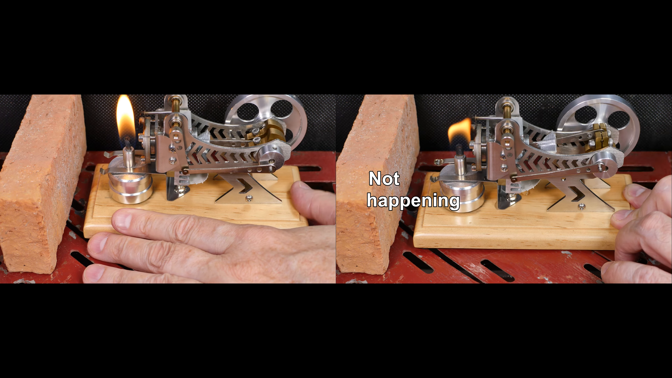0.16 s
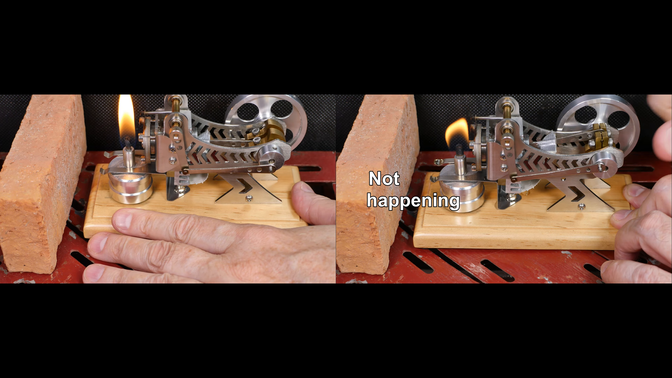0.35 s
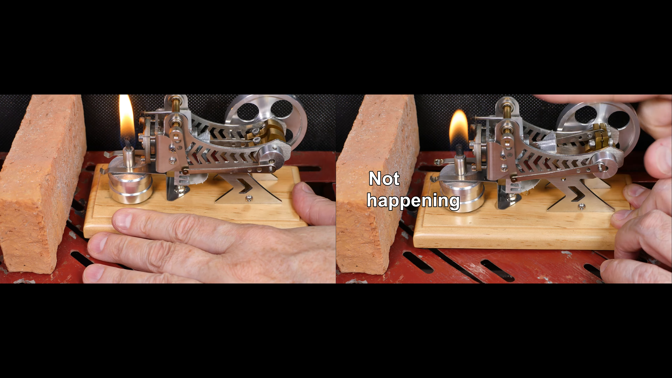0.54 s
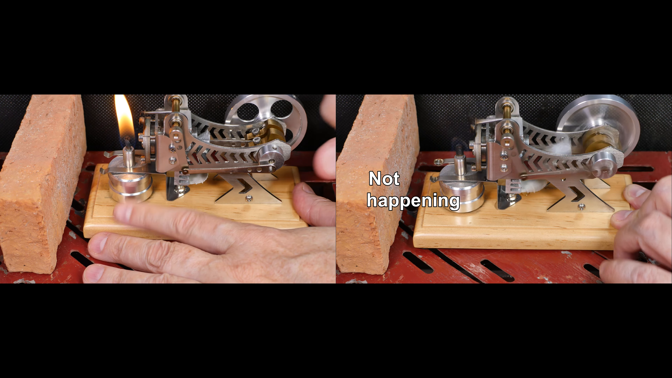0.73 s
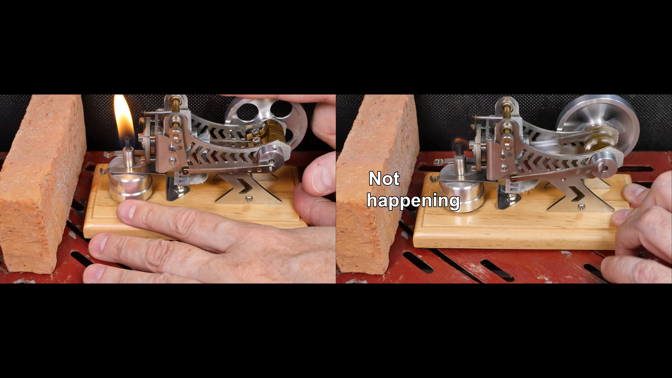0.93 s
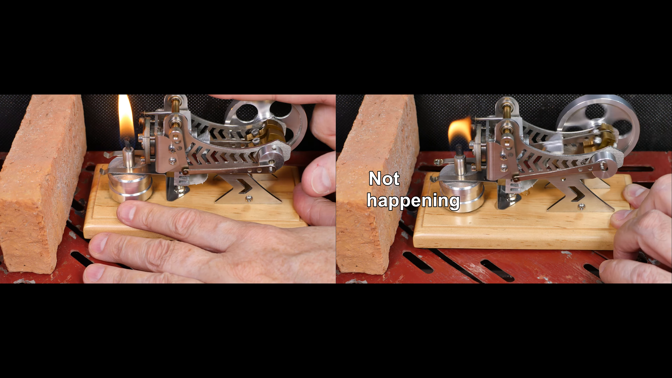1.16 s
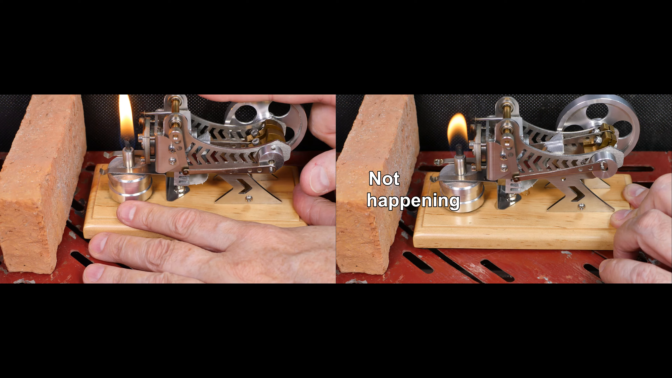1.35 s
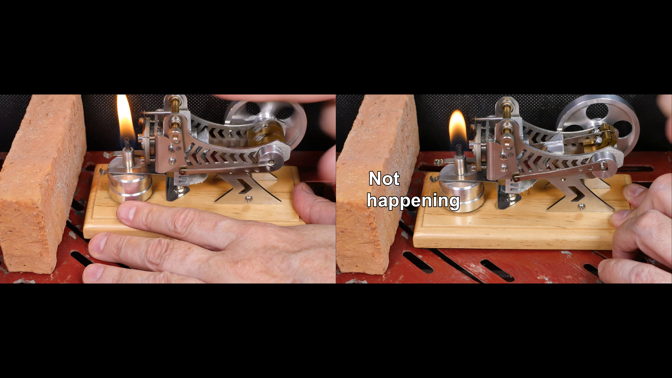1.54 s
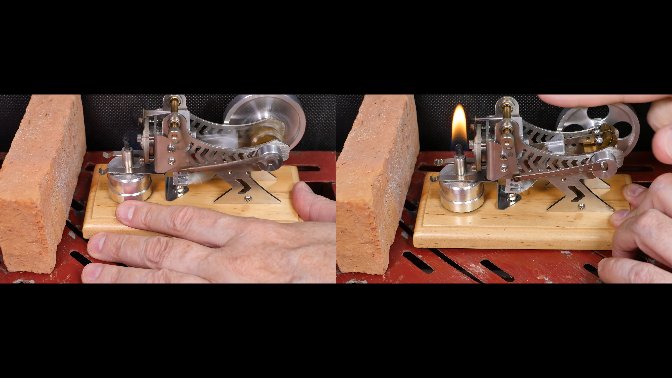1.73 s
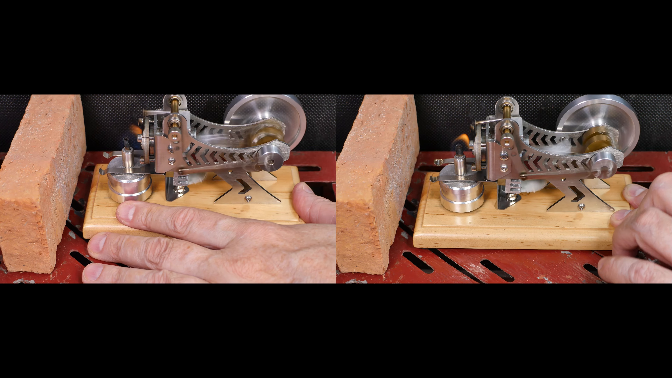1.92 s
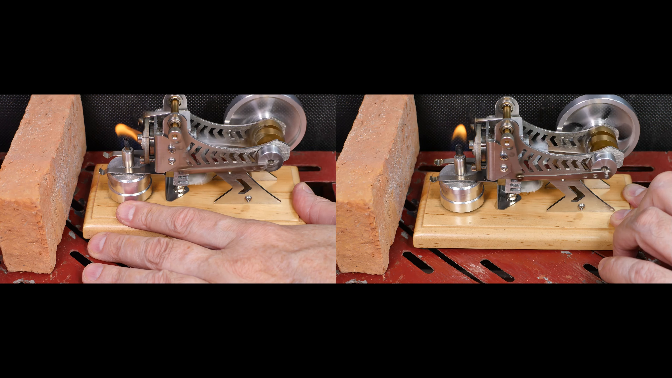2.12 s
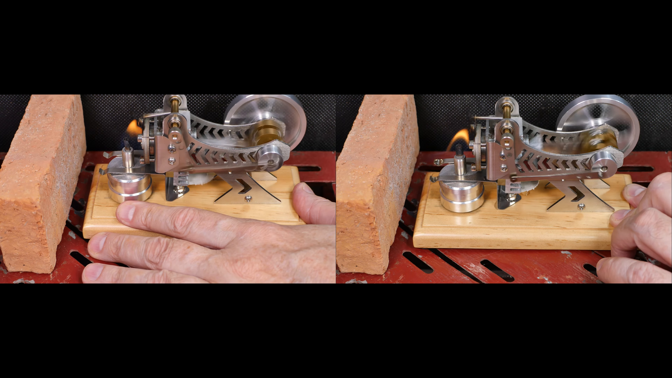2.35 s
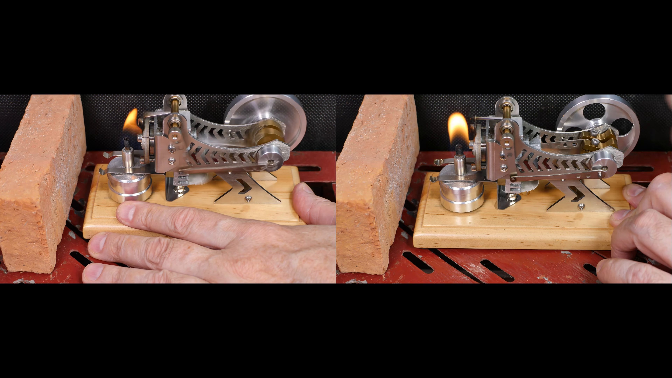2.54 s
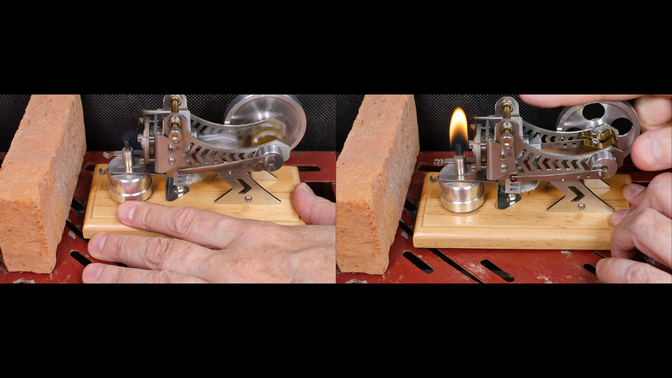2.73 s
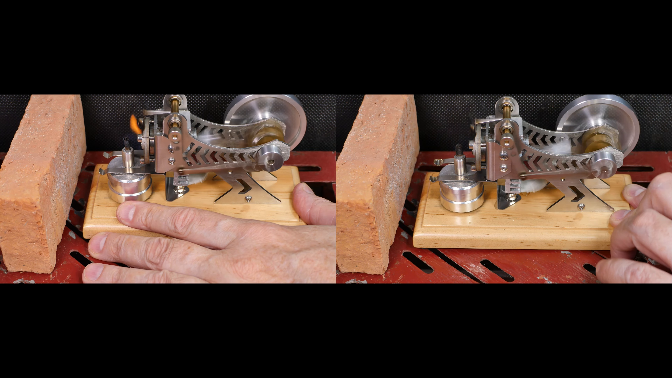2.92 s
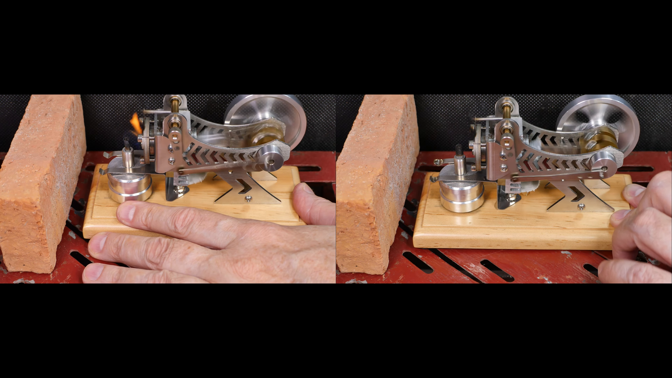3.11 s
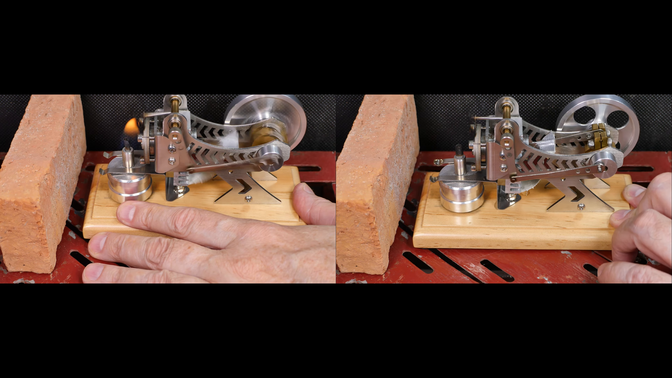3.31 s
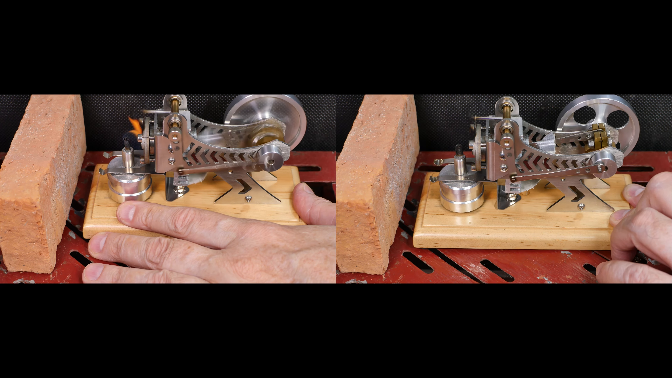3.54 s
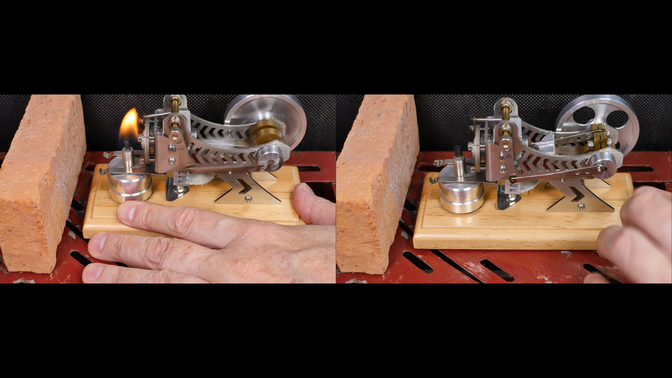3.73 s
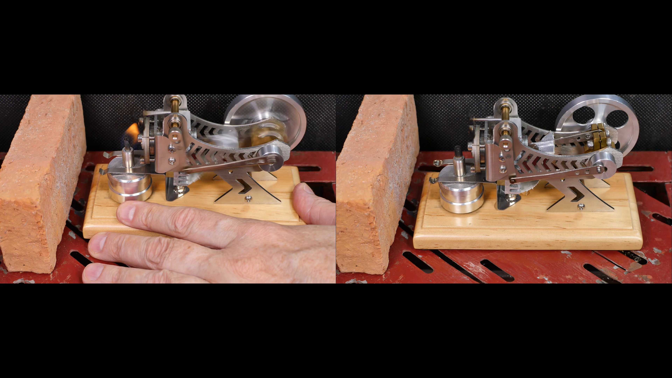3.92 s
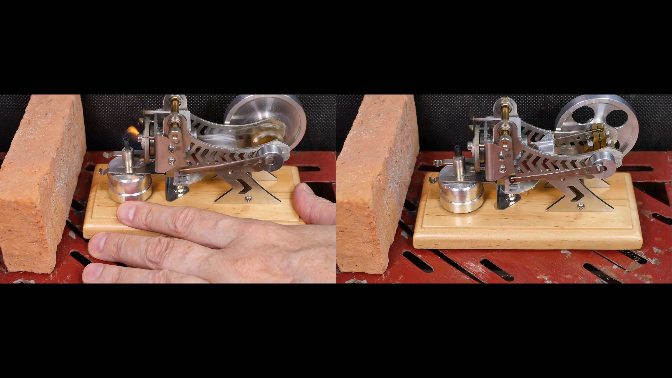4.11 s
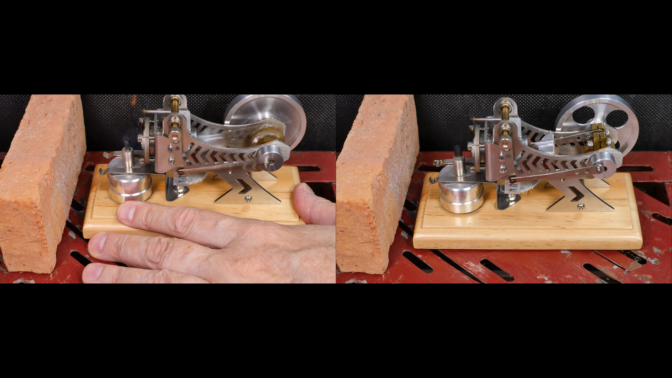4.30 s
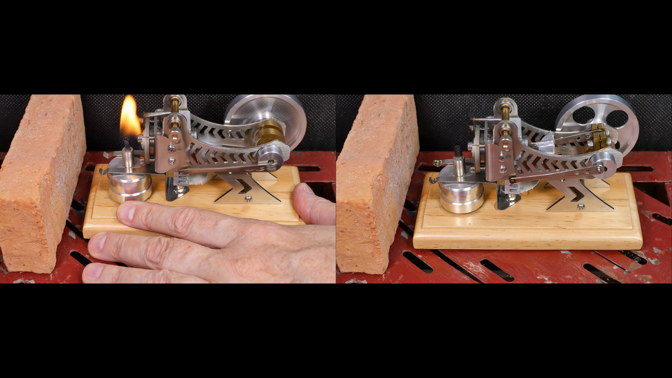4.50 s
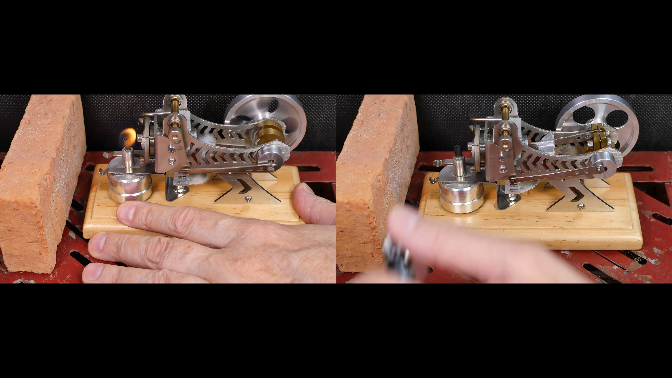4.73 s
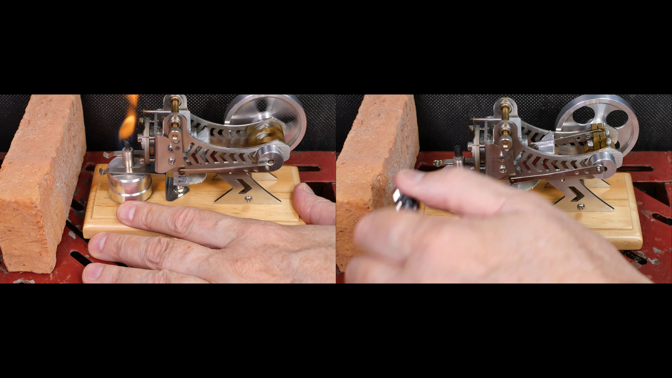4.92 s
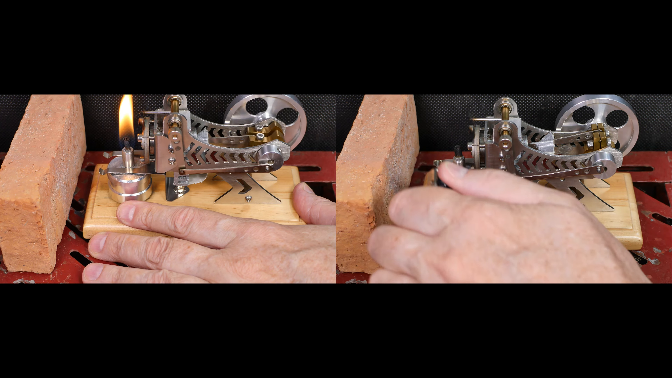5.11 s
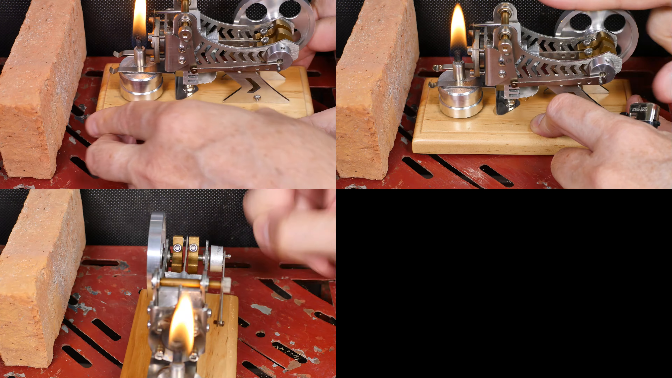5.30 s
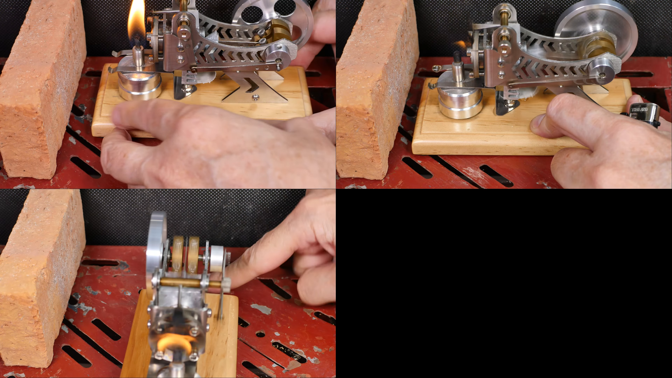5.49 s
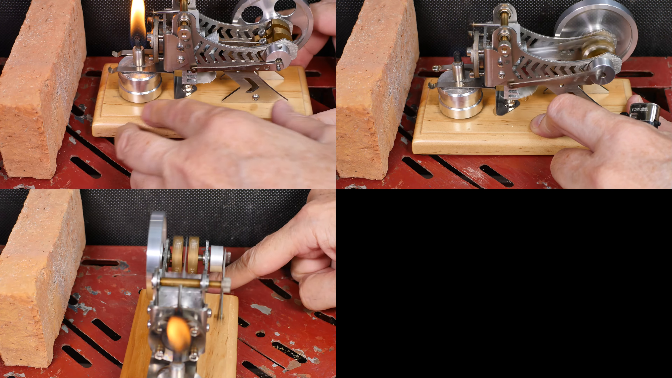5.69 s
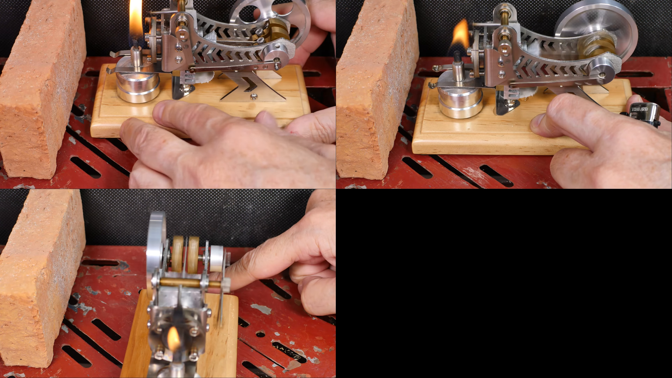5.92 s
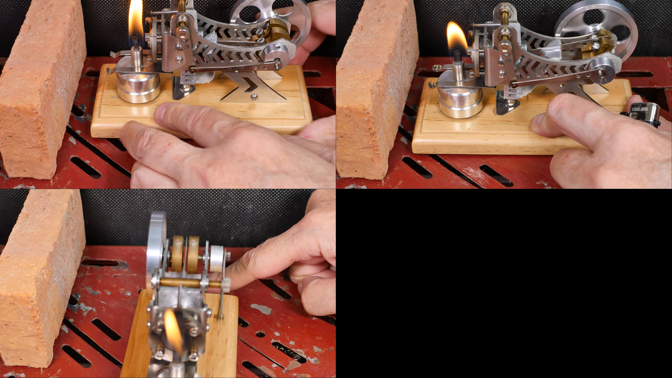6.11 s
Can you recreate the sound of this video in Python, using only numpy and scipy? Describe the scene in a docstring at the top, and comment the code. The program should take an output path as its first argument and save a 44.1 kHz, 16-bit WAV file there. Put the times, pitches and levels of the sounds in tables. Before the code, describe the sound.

A light steel ping and faint drags of fingers on a wooden base open the sound. At about 0.7 seconds a small heat engine's wheel is flicked, giving three sharp pops, some rubbing and another ping. At 1.6 seconds the engine catches and clatters rapidly and regularly, around seventeen strokes a second, each a metallic valve rattle with a small gas pop. The linkage ticks and rubs in between, and harder pops fall out of step near 1.9 and 3 seconds. The engine gradually slows to half that pace and stalls at 4.5 seconds, rocking to rest with light clicks and a ping. A short, dry finger scrape follows near 4.9 seconds. At 5.4 seconds a soft bump and a flick restart the clatter, which runs on, slowing, until about 6 seconds. Everything is close, in stereo, on a reverberant porch with a faint hush of air.

```python
"""A small flame-licker engine on a reverberant porch, close to a stereo pair of microphones.
First a steel part pings and fingers drag on the wooden base; a flick of the wheel gives just three pops.
At 1.6 s the engine catches: once a turn its valve shutter rattles shut and gas pops in the cylinder,
now and then harder and out of step. The linkage ticks and rubs in between, more at speed.
It slows, stalls at 4.5 s and rocks to rest, then is flicked again at 5.4 s and runs on, slowing."""
import sys
import numpy as np
from scipy import signal
from scipy.fft import rfft, irfft
from scipy.io import wavfile

SR = 44100
rng = np.random.default_rng(int(sys.argv[2]) if len(sys.argv) > 2 else 0)


def dump(signal):
    """Clip the signal to [-1, 1] and save it as 16-bit WAV at the path in sys.argv[1]."""
    limited = np.clip(np.atleast_2d(signal).T, -1, 1)
    pcm = np.round(limited * 32767).astype(np.int16)
    wavfile.write(sys.argv[1], SR, pcm)


N = 271215
TIME = np.arange(N) / SR
CRUISE_TURNS_PER_S = 15


def from_db(db):
    """Decibels to gain."""
    return 10 ** (np.asarray(db) / 20)


def unit_rms(x):
    """Scale to unit rms."""
    return x / np.sqrt(np.mean(x ** 2) + 1e-20)


def in_time(points, s=TIME):
    """Read a curve at times s."""
    return np.interp(s, *np.transpose(points))


def at_hz(points, hz):
    """Read a spectrum on a log-frequency axis."""
    f, value = np.transpose(points)
    return np.interp(np.log(hz + 1e-3), np.log(f), value)


def add(track, s, sound):
    """Mix a short sound into a track at time s."""
    i = int(np.clip(round(s * SR), 0, N - 1))
    track[i:i + len(sound)] += sound[:N - i]


def filtered(x, kind, hz):
    """A gentle low-, high- or band-pass."""
    return signal.sosfilt(signal.butter(2, hz, kind, fs=SR, output="sos"), x)


def swell(s, length_s, attack_s, release_s):
    """An envelope that rises up to time s, holds and dies away."""
    return np.exp(-np.maximum(s - TIME, 0) / attack_s - np.clip((TIME - s - length_s) / release_s, 0, 20))


def resonate(x, modes, in_phase=False):
    """Parallel resonances, of alternating sign unless they swing in phase."""
    out = 0
    for k, (hz, width, db) in enumerate(modes):
        r = np.exp(-np.pi * width / SR)
        poles = [1, -2 * r * np.cos(2 * np.pi * hz / SR), r * r]
        ring = (1 - r * r) / 2 * signal.lfilter([1, 0, -1], poles, x + 1e-18)
        out += (1 if in_phase else (-1) ** k) * from_db(db) * ring
    return out


def chatter(length_ms, rise_ms, fall_ms):
    """Metal on metal: tiny contacts that build up, last a moment and die away."""
    ms = TIME[:SR // 50] * 1000
    shape = (1 - np.exp(-ms / rise_ms)) * np.exp(-np.maximum(ms - length_ms, 0) / fall_ms)
    spectrum = rfft(shape * rng.standard_normal(len(ms)))
    # hard contacts cover all frequencies fairly evenly, so flatten the burst's colour
    burst = np.sqrt(shape) * irfft(spectrum / np.sqrt(np.abs(spectrum) + 1e-12), len(ms))
    return burst * np.linalg.norm(shape) / np.linalg.norm(burst)


# Diffuse sound at the two microphones. Each row: frequency in Hz, left-right likeness (clipped to +-1).
MIC_LIKENESS = [(40, -1.7), (120, 0.32), (600, 0.42), (1500, 0.54), (9000, 0.34), (14000, -0.34)]
def diffuse(spectrum, size=N):
    """Coloured noise from all round, partly alike at the two microphones."""
    hz = np.fft.rfftfreq(size, 1 / SR)
    alike = np.clip(at_hz(MIC_LIKENESS, hz), -1, 1)
    mid, side = rfft(rng.standard_normal((2, size)))
    pair = np.sqrt(1 + alike) * mid + np.sqrt(1 - alike) * side * [[1], [-1]]
    return irfft(from_db(at_hz(spectrum, hz)) * pair, size)


# The porch's own hush. Each row: frequency in Hz, relative level in dB.
AIR_SPECTRUM = [(25, -10), (100, -15.5), (140, -1.5), (190, 1.5), (250, -8), (350, -4), (800, -12),
                (2300, -22), (9000, -30), (16000, -45)]
def still_air(level_db=-54.5):
    """Low, steady air all round the microphones."""
    return from_db(level_db) * unit_rms(diffuse(AIR_SPECTRUM))


def whistle(hz=5200, level_db=-73):
    """A faint thin whistle while the engine stands at the start."""
    span = in_time([(.05, 0), (.15, 1), (.5, 1), (.65, 0)])
    return span * from_db(level_db) * np.sin(2 * np.pi * hz * TIME)


# Colour of the porch's reverberation. Each row: frequency in Hz, gain in dB.
PORCH_COLOUR = [(60, 1), (200, -8.5), (400, -3), (580, -9.5), (740, -7.5), (920, -7), (1020, -7.5),
                (1500, -0.5), (2200, -12), (3200, -9.5), (8200, -11), (15000, -13)]
# Its decay. Each row: frequency in Hz, seconds to fall 60 dB.
PORCH_DECAY = [(150, 0.76), (3000, 0.46), (9000, 0.39), (15000, 0.69)]
def porch(x, build_s=.005):
    """The porch answers with a dense tail, each octave dying at its own pace."""
    t, hz = TIME[:SR], np.fft.rfftfreq(SR, 1 / SR)
    noise = rfft(diffuse(PORCH_COLOUR, size=SR))
    build = 1 - np.exp(-(t / build_s) ** 2)
    centres, tail = np.geomspace(125, 16000, 8), 0
    for centre, pick in zip(centres, np.eye(len(centres))):
        octave = irfft(noise * at_hz(np.c_[centres, pick], hz), SR)
        fade = build * from_db(-60 * t / at_hz(PORCH_DECAY, centre))
        tail += octave * fade / np.linalg.norm(fade)
    return signal.fftconvolve(x[None], tail, axes=1)[:, :N]


def wall_echo(x, delay_s=.0095, level_db=-13.5):
    """A nearby wall throws each clack back once."""
    return from_db(level_db) * np.interp(TIME - delay_s, TIME, x, left=0)


# Fingers on the wooden base. Each row: start in seconds, length in seconds, level in dB.
FINGER_DRAGS = [(0.06, 0.079, -64), (0.205, 0.087, -61)]
# The groan of the base. Each row: frequency in Hz, width in Hz, relative level in dB.
GROAN_MODES = [(670, 20, 2), (805, 28, -3), (950, 34, -2)]
def finger_drags():
    """Fingers drag over the base and make it groan faintly."""
    pressure = sum(from_db(db) * swell(s, length_s, attack_s=.008, release_s=.014)
                   for s, length_s, db in FINGER_DRAGS)
    return pressure * unit_rms(resonate(rng.standard_normal(N), GROAN_MODES, in_phase=True))


def rubbing(gain, spectrum, grain_db, grain_ms):
    """Sliding surfaces catch and slip, so their hiss comes in grains."""
    knots = np.cumsum(rng.exponential(1, N // 10)) * grain_ms / 1000
    grip = np.clip(rng.standard_normal(len(knots)), -2, 2)
    grains = from_db(grain_db * np.interp(TIME, knots, grip))
    return gain * unit_rms(grains * diffuse(spectrum).mean(axis=0))


def finger_scrape(start_s=4.921, level_db=-34):
    """One short, dry scrape of the fingers after the stall."""
    pressure = from_db(level_db) * swell(start_s, length_s=.01, attack_s=.007, release_s=.0049)
    spectrum_hz_db = [(500, -23), (6500, 3.5), (11000, 6), (15000, -26)]
    return rubbing(pressure, spectrum_hz_db, grain_db=3.5, grain_ms=1.89)


# The hand bumps the base as it flicks the wheel. Each row: start in seconds, relative level in dB.
HAND_BUMPS = [(0.685, -28), (5.38, -22.5)]
# The board under the engine. Each row: frequency in Hz, width in Hz, relative gain in dB.
BOARD_MODES = [(189, 23, -1.5), (244, 25, -0.5), (310.5, 40, -2.5), (374.5, 12, -0.5), (744, 183, -7),
               (888, 31, -3), (1205, 105, -6)]
def base_board(shaking, gain_db=5.5, bump_db=-4):
    """The board rings with the engine; soft bumps of the hand stir its lowest mode."""
    t, lowest_hz = TIME[:SR // 100], BOARD_MODES[0][0]
    push = np.hanning(len(t)) * np.sin(2 * np.pi * lowest_hz * t)
    bumps = np.zeros(N)
    for s, db in HAND_BUMPS:
        add(bumps, s, from_db(db + bump_db) * push)
    return from_db(gain_db) * resonate(shaking + bumps, BOARD_MODES, in_phase=True)


# The flywheel in its two runs. Each row: time in seconds, speed in turns per second.
FIRST_RUN_SPEED = [(1.5812, 17.279), (1.75, 19.2028), (1.9, 16.7275), (2.01, 17.3514), (2.11, 14.9954),
                   (2.23, 16.6267), (2.33, 14.5914), (2.54, 14.898), (3.14, 11.6642), (3.44, 10.3425),
                   (4.14, 8.7703), (4.26, 9.1897), (4.5057, 8.2335)]
SECOND_RUN_SPEED = [(5.3773, 18.1521), (5.74, 16.0957), (5.88, 12.9677), (5.98, 13.8016), (6.0886, 12.2545)]
def wheel_speed(spin_up_s=.032, run_out_s=.46):
    """Turns per second: a flick spins the wheel up, and after the last stroke it runs out."""
    return sum(in_time([(run[0][0] - spin_up_s, 0), *run, (run[-1][0] + run_out_s, 0)])
               for run in (FIRST_RUN_SPEED, SECOND_RUN_SPEED))


def turns():
    """Start time and speed of every turn of the flywheel."""
    rows = []
    for run in (FIRST_RUN_SPEED, SECOND_RUN_SPEED):
        t = TIME[TIME >= run[0][0]]
        turned = np.cumsum(in_time(run, t)) / SR
        count = round(np.interp(run[-1][0], t, turned)) + 1
        starts = np.interp(np.arange(count), turned, t)
        rows += zip(starts, in_time(run, starts))
    return rows


# The wheel is moved by hand or rocks to rest.
# Each row: start in seconds, length in seconds, rubbing in dB, rumble in dB.
WHEEL_NUDGES = [(0.0, 0.0074, -46, -78), (0.671, 0.41, -50.5, -64), (1.542, 0.024, -49.5, -76),
                (4.647, 0.1, -49, -77), (4.872, 0.064, -52, -54), (5.347, 0.026, -36.5, -39.5)]
# Rubbing linkage and rumbling base, heard close. Each row: frequency in Hz, relative level in dB.
RUB_SPECTRUM = [(300, 1), (700, 12.5), (1500, -1), (2500, 8.5), (5000, -1), (9000, -2), (12000, -8),
                (16000, -49)]
RUMBLE_SPECTRUM = [(50, -48), (100, -15), (170, -3), (350, 11.5), (700, 15), (1500, -96), (16000, -70)]
def friction(cruise_rub_db=-47, cruise_rumble_db=-56):
    """The linkage rubs and the base rumbles: both grow with speed and swell at each nudge."""
    pace = wheel_speed() / CRUISE_TURNS_PER_S
    rub = from_db(cruise_rub_db) * pace ** 2.47
    rumble = from_db(cruise_rumble_db) * pace ** .78
    for s, length_s, rub_db, rumble_db in WHEEL_NUDGES:
        push = swell(s, length_s, attack_s=.0097, release_s=.045)
        rub = np.hypot(rub, from_db(rub_db) * push)
        rumble = np.hypot(rumble, from_db(rumble_db) * push)
    return (rubbing(rub, RUB_SPECTRUM, grain_db=6, grain_ms=2.3)
            + rubbing(rumble, RUMBLE_SPECTRUM, grain_db=6, grain_ms=18))


# Knocks on a steel part. Each row: start in seconds, relative tick and ring in dB, favoured pitch in Hz.
STEEL_KNOCKS = [(0.001, -28, -35.5, 3420), (0.034, -40, -42, 3300), (1.049, -15, -32.5, 3350),
                (2.138, -8, -30, 3390), (4.7341, -11.5, -32, 3700), (5.408, -15, -30, 2660),
                (5.553, -24, -34.5, 3550), (5.736, -25, -33, 3450), (5.965, -7, -33, 3370)]
# Its bright clink and thin lingering ring. Each row: frequency in Hz, width in Hz, relative gain in dB.
STEEL_MODES = [(2560, 220, 0), (3050, 60, -2), (3400, 130, -3), (3620, 150, -1), (3192, 5, 5), (3278, 5, 2),
               (3450, 8, 3), (3545, 7, 6.5), (3714, 7, -2)]
def steel_pings(gain_db=30.5, favour_db_per_octave=22):
    """A knock leaves a steel part ringing; where it lands decides which modes ring most."""
    out = np.zeros(N)
    for s, _, ring_db, favoured_hz in STEEL_KNOCKS:
        blow = np.pad(from_db(ring_db + gain_db) * np.hanning(8), (0, SR // 2))
        modes = [(hz, width, db - favour_db_per_octave * abs(np.log2(hz / favoured_hz)))
                 for hz, width, db in STEEL_MODES]
        add(out, s, resonate(blow, modes))
    return out


def return_ticks(after_turns=.46, cruise_db=-28.5, scatter_db=1.5):
    """The linkage ticks as it swings back in each turn, harder at speed."""
    rows = []
    for s, speed in turns():
        speed_db = min(speed - CRUISE_TURNS_PER_S, 1)  # 1 dB for each turn per second, capped
        rows.append((s + after_turns / speed, cruise_db + speed_db - scatter_db * rng.standard_normal()))
    return rows


# Further clicks of the linkage: during the runs, extra ticks as it swings back in a turn; around the stall and
# the second flick, clicks as the wheel is gripped or rocks. Each row: start in seconds, relative level in dB.
JOINT_TICKS = [(1.6155, -16.5), (1.6685, -29), (1.7222, -30), (1.776, -17.5), (1.8884, -18),
               (1.9465, -17.5), (2.066, -14), (2.129, -18), (2.3204, -16), (2.388, -15), (2.6585, -21.5),
               (4.6387, -25.5), (4.699, -30), (4.856, -27.5), (4.8745, -18.5), (5.002, -26),
               (5.3423, -20.5), (5.361, -19), (5.3697, -9), (5.4145, -16), (5.4658, -11), (5.58, -17),
               (5.6391, -18)]
def linkage(gain_db=-12.5):
    """Contact force on the frame from loose joints and from the knocks on the steel part."""
    force = np.zeros(N)
    for s, db in return_ticks() + list(JOINT_TICKS):
        add(force, s, from_db(db + gain_db) * chatter(1, rise_ms=.2, fall_ms=2.4))
    for s, tick_db, _, _ in STEEL_KNOCKS:
        add(force, s, from_db(tick_db + gain_db) * chatter(.27, rise_ms=1, fall_ms=2.8))
    return force


# Steel shutter and frame, then their top modes. Each row: frequency in Hz, width in Hz, gain in dB.
FRAME_MODES = [(1130, 100, 1), (1713, 83, -9.5), (2033, 174, -1), (2362, 192, 5.5), (2633, 50, 1.5),
               (3084, 200, -4), (3625, 270, -2.5), (4260, 580, -2.5), (4980, 570, 0.5), (5690, 270, -2),
               (6780, 1300, -5), (8077, 150, 4.5), (8690, 275, 3.5), (8880, 32, 0.5), (9600, 260, -3.5),
               (10360, 170, -6)]
TOP_MODES = [(10000, 100, -40), (12100, 1100, -25), (14300, 300, -20.5)]
# The top treble comes and goes. Each row: time in seconds, gain in dB.
TOP_GAIN = [(0.8, -2), (1.6, 13), (2.85, 13.5), (3.15, -40), (4.5, -57), (5.4, -35), (6.1, 1)]
def frame_ring(contacts, gain_db=2.5, soft_hz=11000):
    """Contacts ring the shutter and frame: returns the whole close clack, and its top treble alone."""
    top = resonate(contacts * from_db(in_time(TOP_GAIN)), TOP_MODES)
    ring = filtered(resonate(contacts, FRAME_MODES, in_phase=True), "low", soft_hz)
    return from_db(gain_db) * (ring + top), top


# Hard, late pops out of step with the turns. Each row: start in seconds, wait from shutter to pop in ms,
# shutter in dB, pop in dB, pop pitch in Hz, crack in dB, buzz in dB; all levels are relative.
HARD_STROKES = [(0.6814, 3.4, -24, -20, 650, -41, -42), (0.7486, 5.03, -23, -17, 750, -14.5, -17.5),
                (0.8436, 7.04, -29, -16.5, 800, -14, -40), (1.8293, 6.5, -27, -15, 654, -24, -40),
                (1.9129, 5.7, -25, -16, 850, -37, -17), (2.8961, 4, -25, -17.5, 695, -33, -15),
                (2.9563, 6.35, -23.5, -15.5, 800, -21.5, -20), (3.0501, 12, -30.5, -18.5, 650, -40, -42),
                (5.378, 3.61, -26, -19, 635, -37, -22), (5.4414, 4.7, -28, -17.5, 840, -18, -15.5),
                (5.5194, 5.96, -27, -17, 764, -17.5, -21), (5.6211, 5.2, -28.5, -16.5, 780, -19, -32),
                (5.748, 5.9, -30.5, -17.5, 710, -22.5, -34)]
# The hollow of the cylinder mouth. Each row: frequency in Hz, width in Hz, gain in dB.
MOUTH_MODES = [(1180, 100, 4.5), (1846, 260, 3.5), (2200, 730, -1.5), (4870, 960, -7)]
def mouth_cracks(gain_db=14.5, lead_ms=.703):
    """The steep front of a hard pop cracks in the mouth of the cylinder."""
    front = np.zeros(N)
    for s, wait_ms, *_, crack_db, _ in HARD_STROKES:
        add(front, s + (wait_ms - lead_ms) / 1000, from_db(crack_db + gain_db) * np.hanning(6))
    return resonate(front, MOUTH_MODES)


# The shutter blade. Each row: frequency in Hz, width in Hz, gain in dB.
BLADE_MODES = [(5420, 300, 0), (5750, 400, 9), (6800, 430, 1)]
def blade_buzzes(gain_db=-6):
    """While a late pop builds up, the blade buzzes on its seat with a metallic ring."""
    force = np.zeros(N)
    for s, wait_ms, *_, buzz_db in HARD_STROKES:
        add(force, s, from_db(buzz_db + gain_db) * chatter(wait_ms - 1, rise_ms=.6, fall_ms=1))
    return resonate(force, BLADE_MODES)


# Strength of the ordinary pops. Each row: time in seconds, relative level in dB.
POP_STRENGTH = [(1.58, -22.5), (1.64, -21), (2.0, -23), (3.0, -22.5), (3.5, -20), (4.5, -22), (5.5, -23.5),
                (6.1, -23.5)]
def even_strokes(lag_turns=.03103, cruise_hz=793, cruise_db=-26.5, scatter_db=2.1):
    """Each turn the shutter closes and a pop follows; a slow wheel shuts softer and pops higher."""
    rows = []
    for s, speed in turns():
        force_jitter, pitch_jitter = rng.standard_normal(2)
        overspeed = speed - CRUISE_TURNS_PER_S
        hz = (cruise_hz - 5.5 * overspeed) * (1 + .03 * pitch_jitter)
        wait_ms = 1000 * lag_turns / speed
        shutter_db = cruise_db + .1744 * overspeed + scatter_db * force_jitter
        rows.append((s, wait_ms, shutter_db, in_time(POP_STRENGTH, s), hz))
    return rows


def lateness(wait_ms):
    """0 for a prompt pop, 1 when it comes long after the shutter has closed."""
    return np.clip((wait_ms - 3.5) / 2, 0, 1)


def cylinder_hum(strokes, gain_db=-17.5, start_hz=522, end_hz=428, sink_ms=27, fall_ms=27):
    """After each pop the air in the cylinder hums on, sinking in pitch as the piston moves."""
    hum, ms = np.zeros(N), TIME[:SR // 8] * 1000
    hz = end_hz + (start_hz - end_hz) * np.exp(-ms / sink_ms)
    note = -np.sin(2 * np.pi * np.cumsum(hz) / SR) * np.exp(-ms / fall_ms) * np.tanh(ms / 2)
    for s, wait_ms, _, pop_db, _ in strokes:
        add(hum, s + wait_ms / 1000, from_db(pop_db + gain_db) * note)
    return hum


def shutter(strokes, longest_ms=2.18, slide_db=-18.5, snap_db=-14):
    """Contact force of the shutter: it slides, rattles onto its seat, and a late pop snaps it open."""
    force = np.zeros(N)
    for s, wait_ms, shutter_db, pop_db, _ in strokes:
        slide = from_db(shutter_db + slide_db) * chatter(6, rise_ms=.5, fall_ms=2)
        rattle = from_db(shutter_db) * chatter(min(wait_ms, longest_ms), rise_ms=.06, fall_ms=2.7)
        snap = from_db(pop_db + snap_db) * chatter(.5, rise_ms=.1, fall_ms=1)
        add(force, s - .0065, slide)
        add(force, s, rattle)
        add(force, s + (wait_ms - 1) / 1000, lateness(wait_ms) * snap)
    return force


def gas_pops(strokes, gain_db=-1.5, rise_ms=.54, prompt_fall_ms=1.42, late_fall_ms=1):
    """A pop is a few swings of gas pressure, sagging in pitch; a late one is shorter and steeper."""
    pressure = np.zeros(N)
    ms = np.arange(-SR // 500, SR // 80) / SR * 1000
    for s, wait_ms, _, pop_db, hz in strokes:
        late = lateness(wait_ms)
        fall_ms = prompt_fall_ms + late * (late_fall_ms - prompt_fall_ms)
        envelope = np.exp(-(np.minimum(ms, 0) / rise_ms) ** 2 - np.maximum(ms, 0) / fall_ms)
        phase = 2 * np.pi * hz * (.9 * ms + .057 * np.tanh(ms)) / 1000  # settles at 0.9 of hz
        wave = np.cos(phase) - late * (.046 * np.sin(2 * phase) + .055 * np.cos(3 * phase))
        add(pressure, s + (wait_ms + ms[0]) / 1000, from_db(pop_db + gain_db) * envelope * wave)
    return filtered(pressure, "high", hz=214)  # so small a source radiates no deep bass


def scene():
    """The engine close to the microphones; behind it a wall, the porch and its still air."""
    strokes = even_strokes() + [stroke[:5] for stroke in HARD_STROKES]
    contacts = shutter(strokes) + linkage()
    gas, cracks = gas_pops(strokes), mouth_cracks()
    clack, top = frame_ring(contacts)
    body = gas + base_board(gas + contacts) + steel_pings() + cracks + blade_buzzes()
    body += finger_drags() + friction() + finger_scrape()
    near = clack + body + cylinder_hum(strokes)
    # summed over all directions the frame's peaks even out, so the porch gets a smoother clack
    smooth_clack = from_db(4.5) * filtered(contacts, "band", hz=[1200, 10200])
    radiated = smooth_clack + .067 * clack + 3 * top + .27 * cracks + body
    return near + wall_echo(clack) + porch(radiated) + still_air() + whistle()


# Balance of the pair. Each row: frequency in Hz, left microphone over right in dB.
MIC_BALANCE = [(100, 2.5), (300, 1), (700, -1), (1400, -2.5), (2800, -2.5), (5600, -1), (10000, 2.5),
               (14000, -1)]
def record(dry, cutoff_hz=15800):
    """The two microphones differ a little in colour; the top is cut steeply."""
    lean_db = at_hz(MIC_BALANCE, np.fft.rfftfreq(2 * N, 1 / SR)) * [[.5], [-.5]]
    heard = irfft(rfft(dry, 2 * N) * from_db(lean_db))[:, :N]
    return signal.sosfilt(signal.ellip(10, .1, 80, cutoff_hz, fs=SR, output="sos"), heard)


dry = scene()
out = record(dry)
dump(out)
```